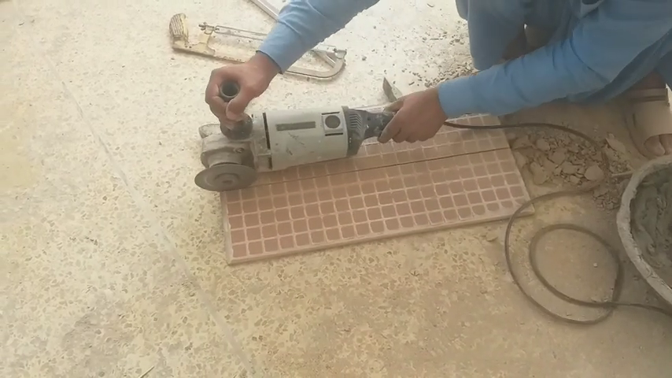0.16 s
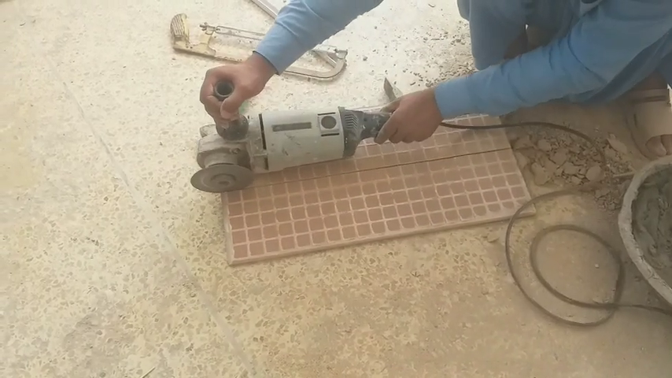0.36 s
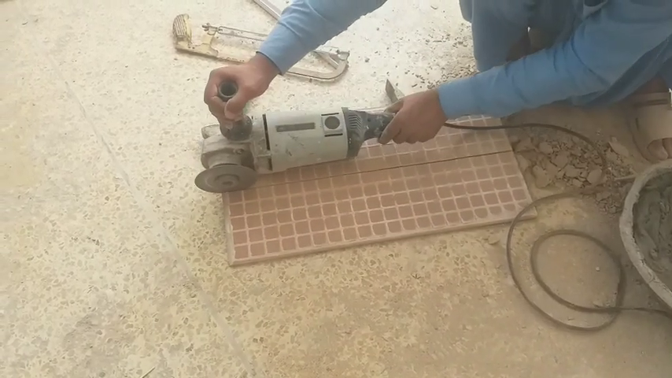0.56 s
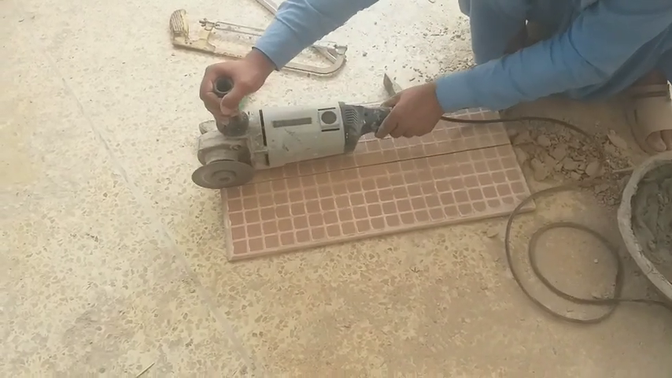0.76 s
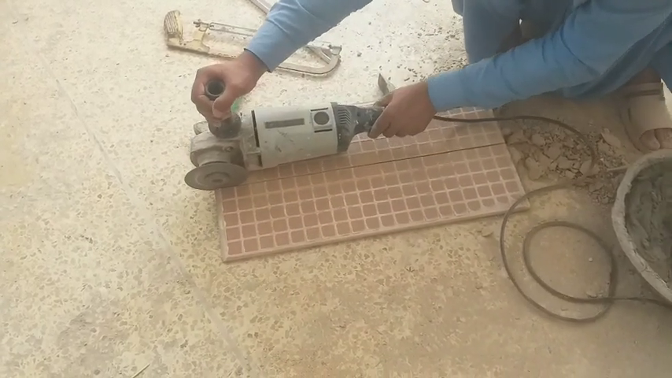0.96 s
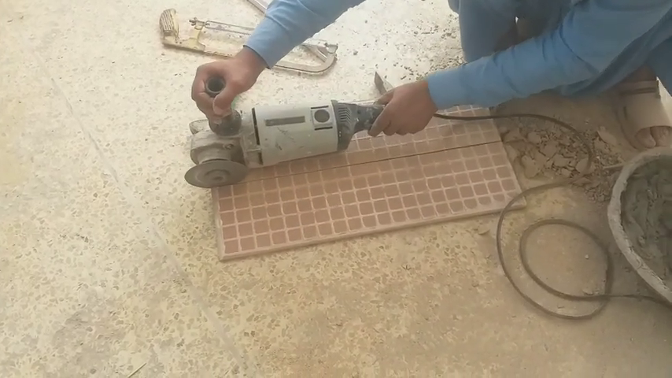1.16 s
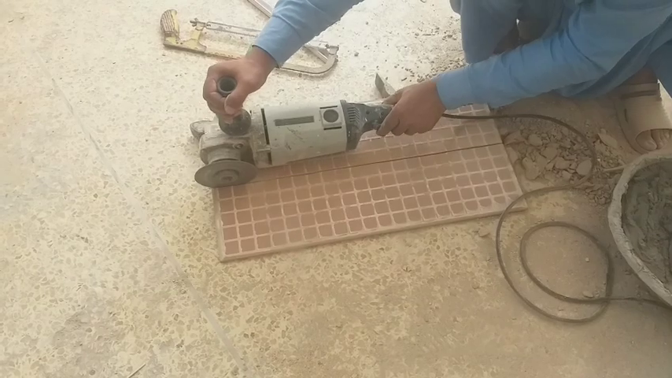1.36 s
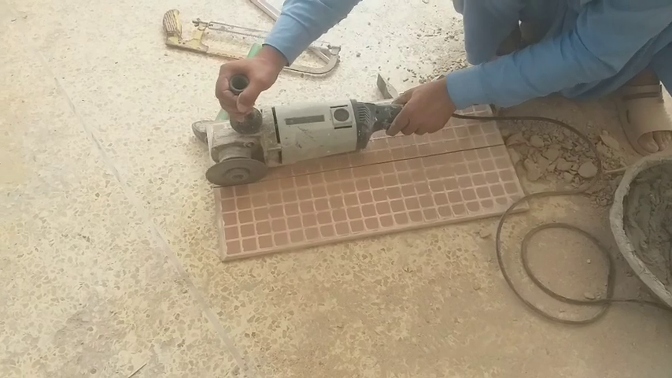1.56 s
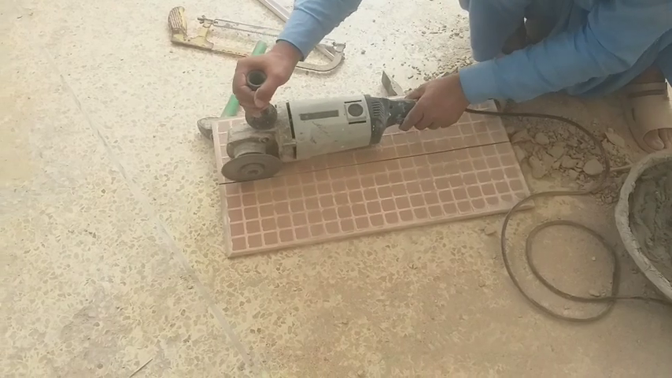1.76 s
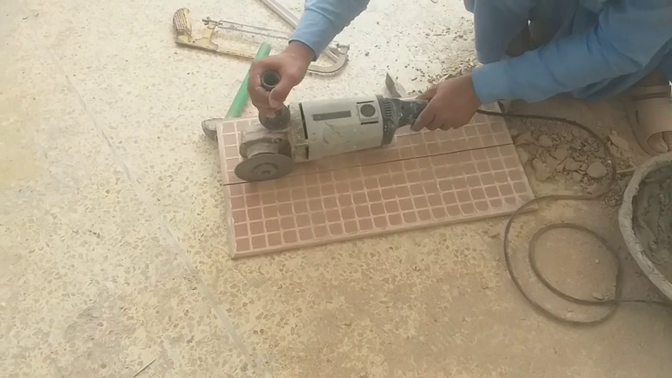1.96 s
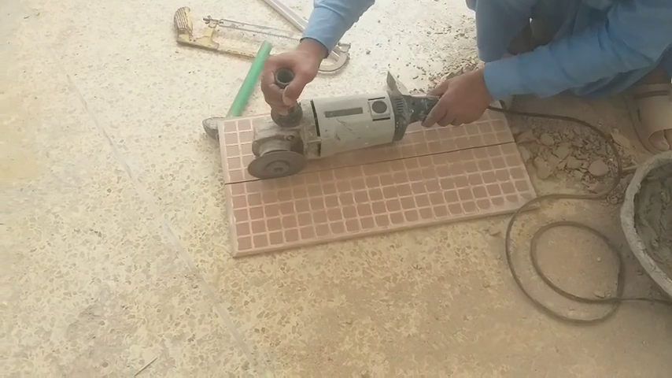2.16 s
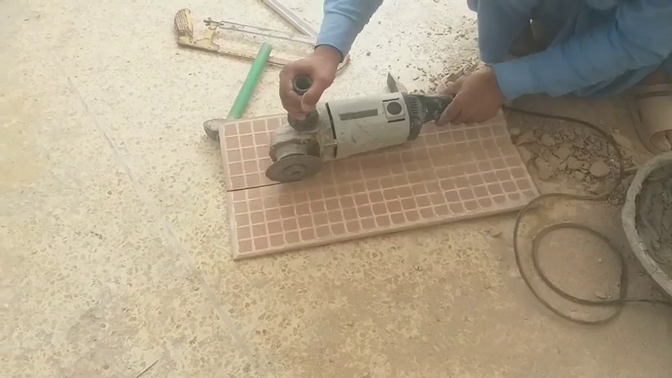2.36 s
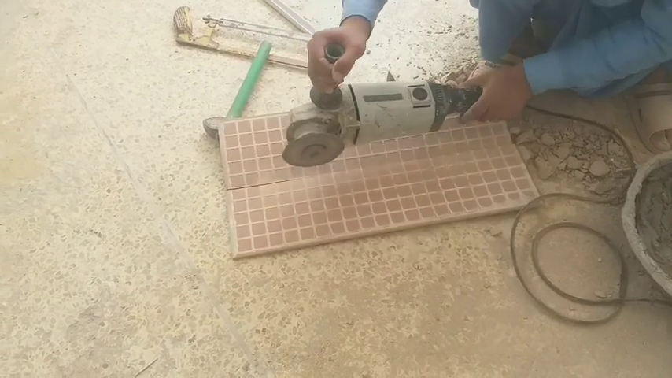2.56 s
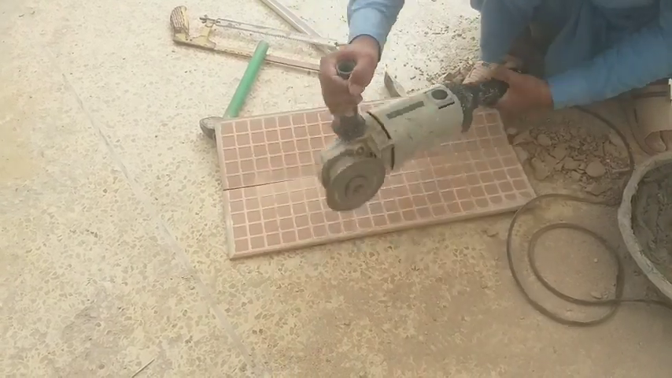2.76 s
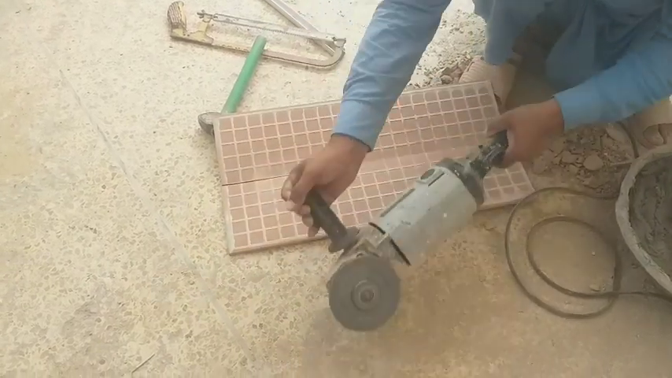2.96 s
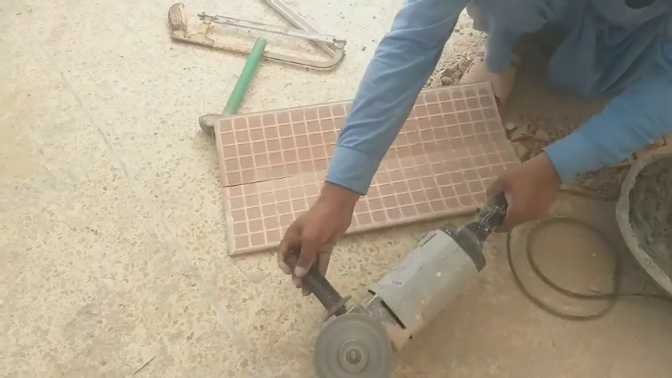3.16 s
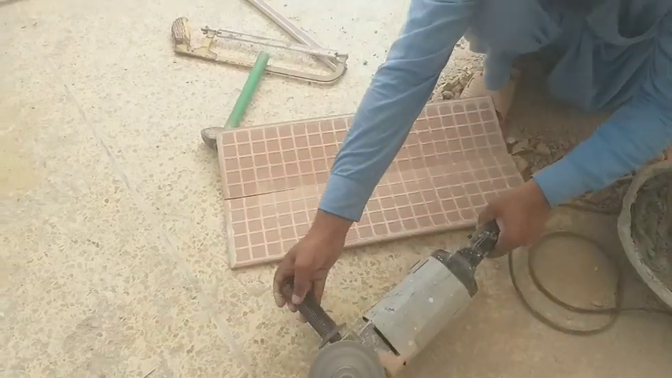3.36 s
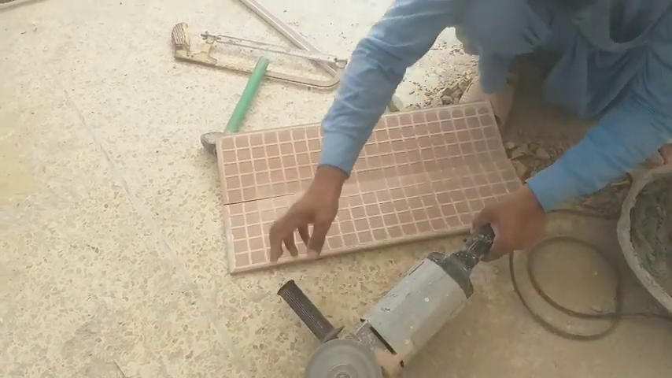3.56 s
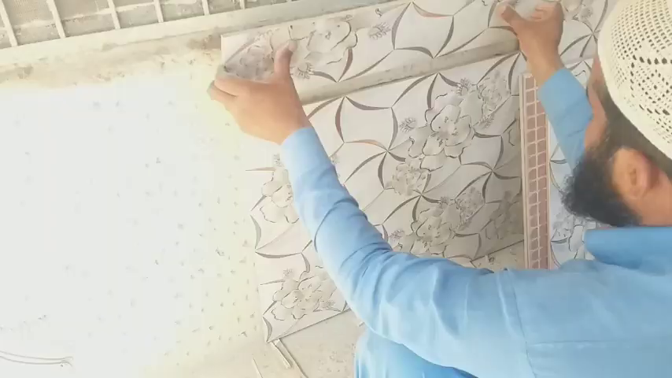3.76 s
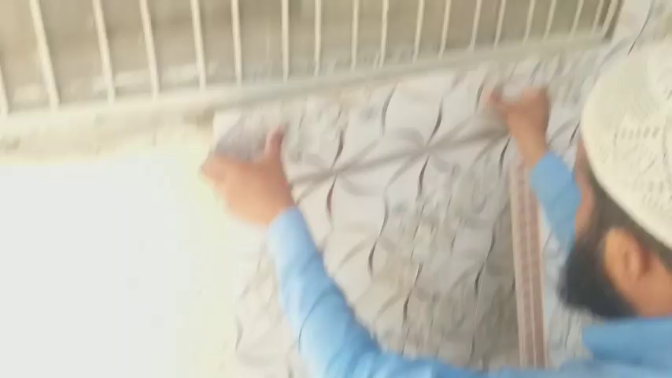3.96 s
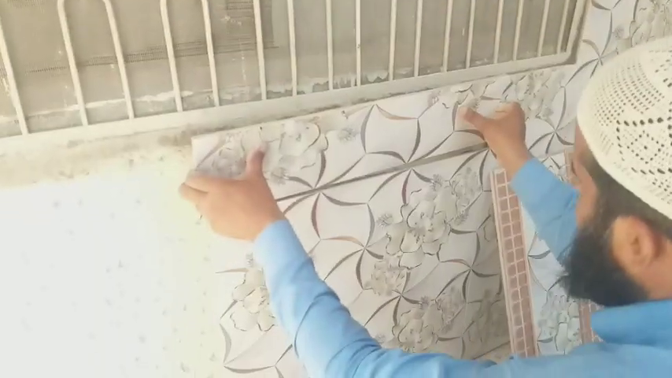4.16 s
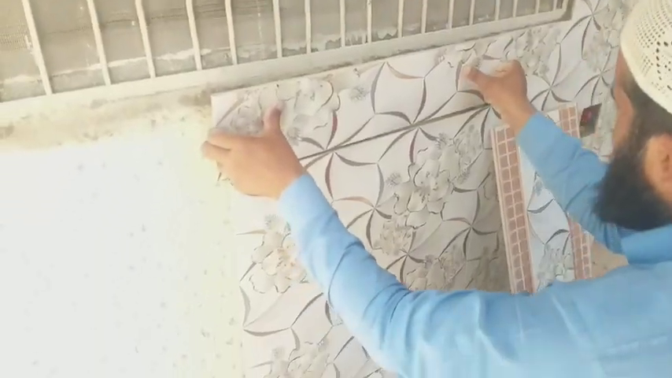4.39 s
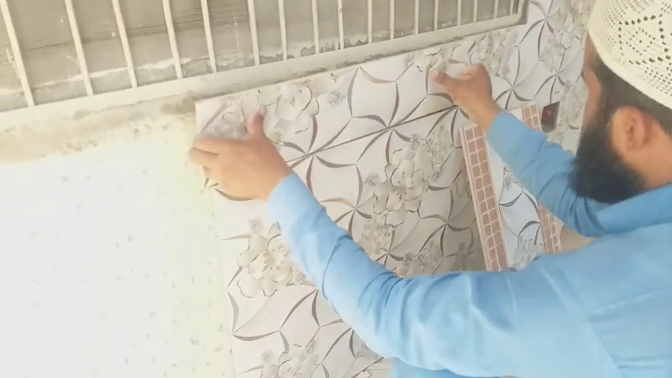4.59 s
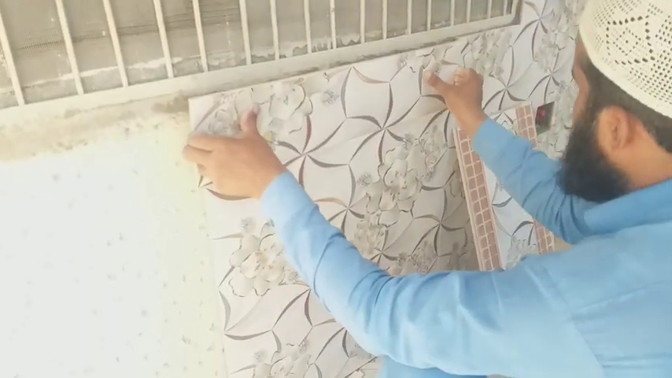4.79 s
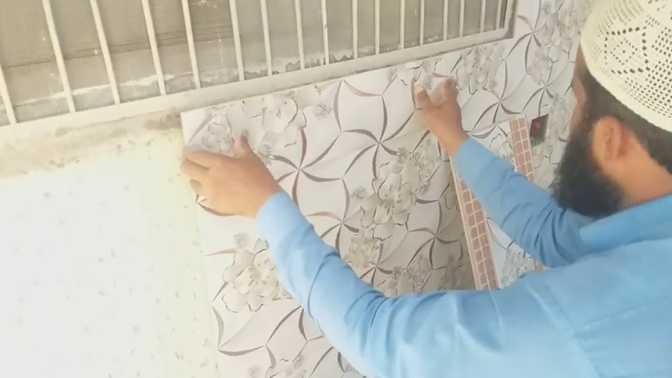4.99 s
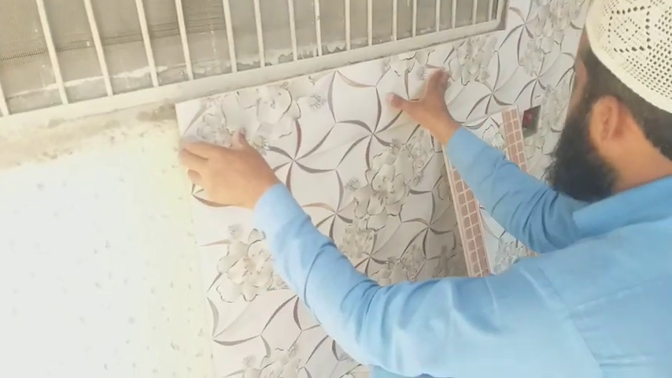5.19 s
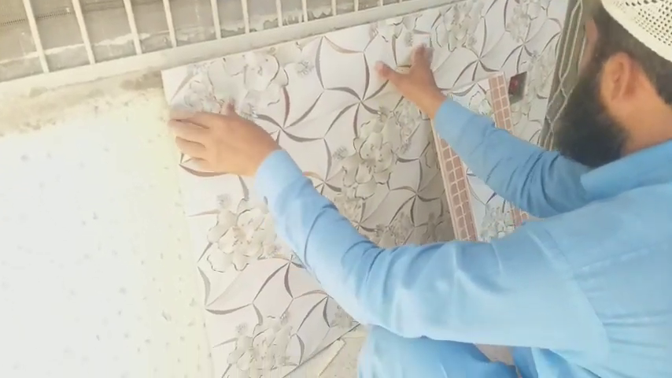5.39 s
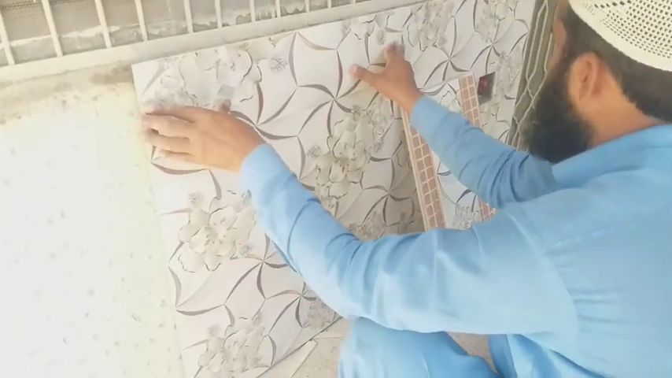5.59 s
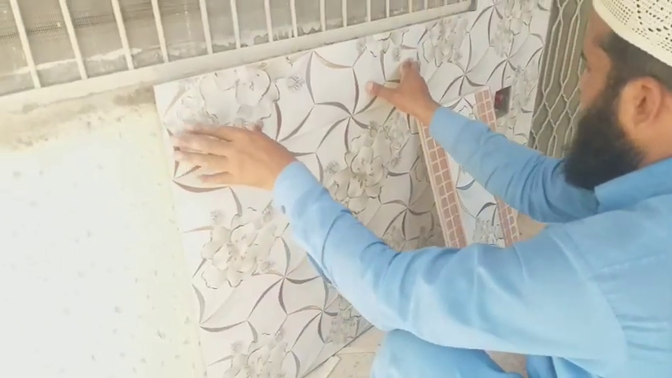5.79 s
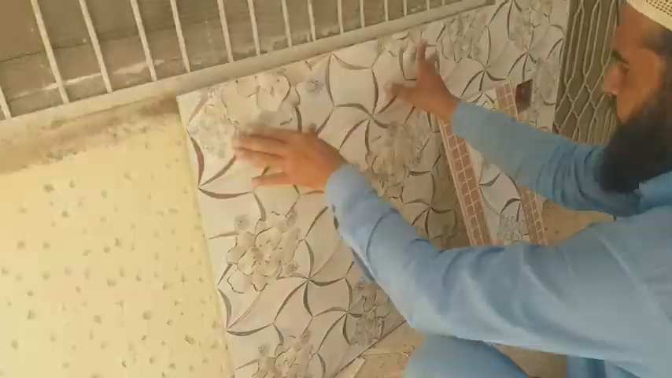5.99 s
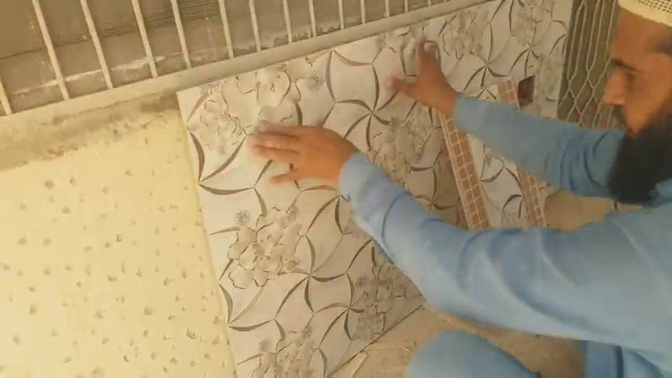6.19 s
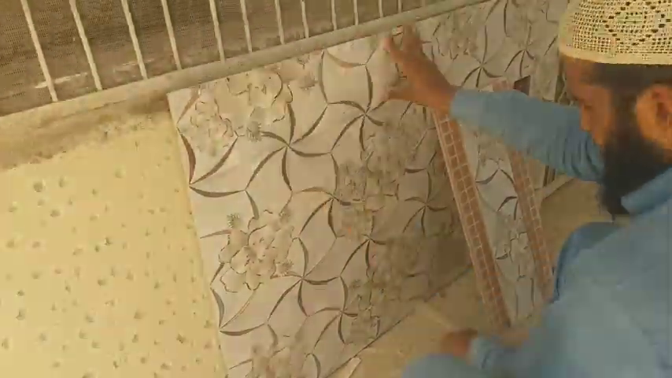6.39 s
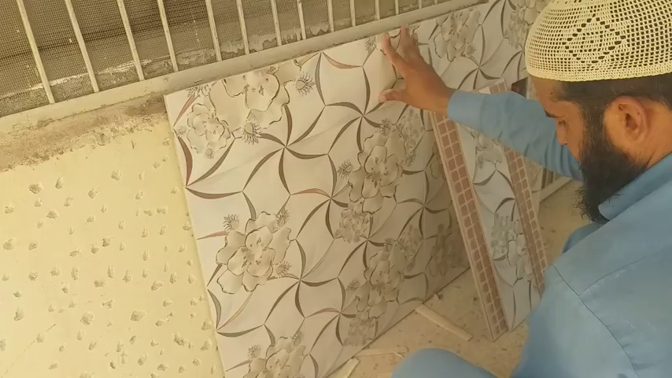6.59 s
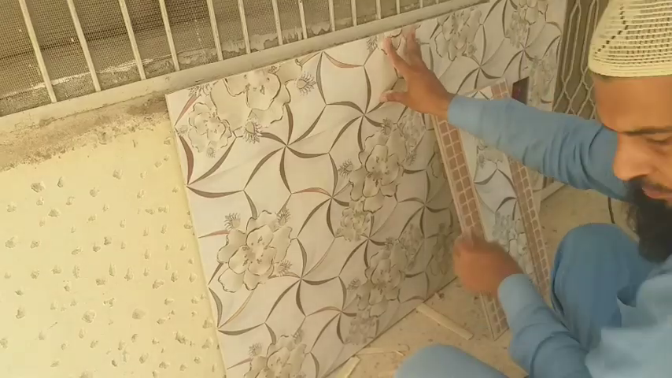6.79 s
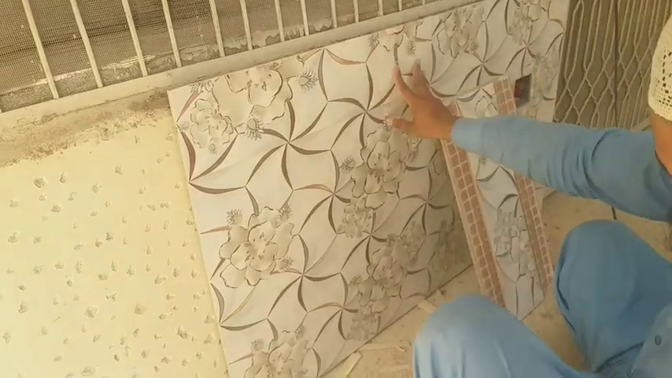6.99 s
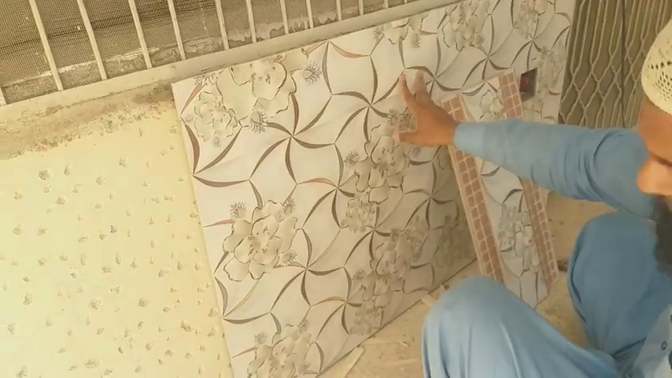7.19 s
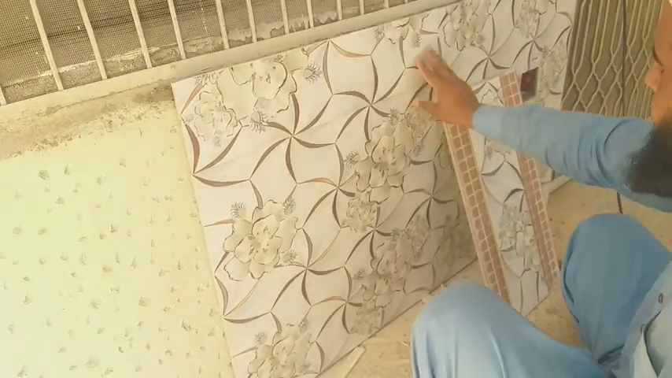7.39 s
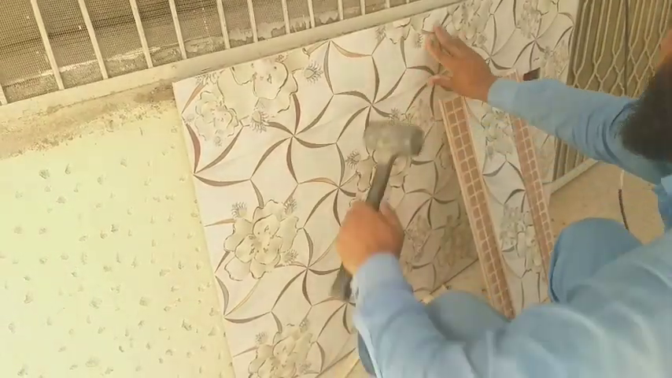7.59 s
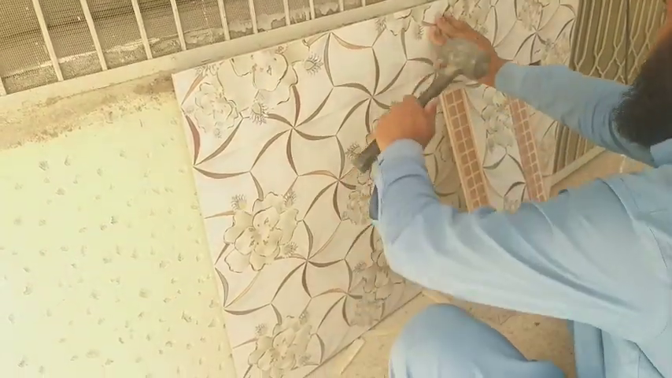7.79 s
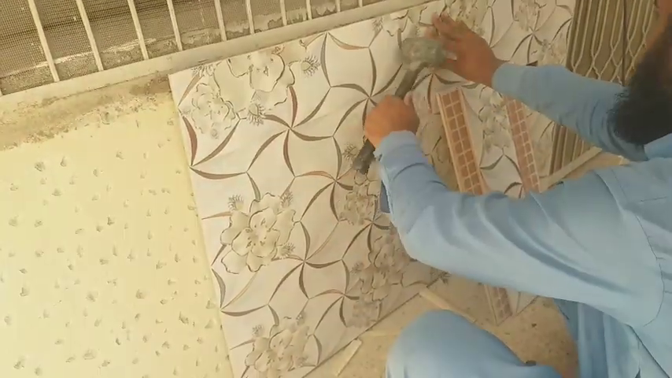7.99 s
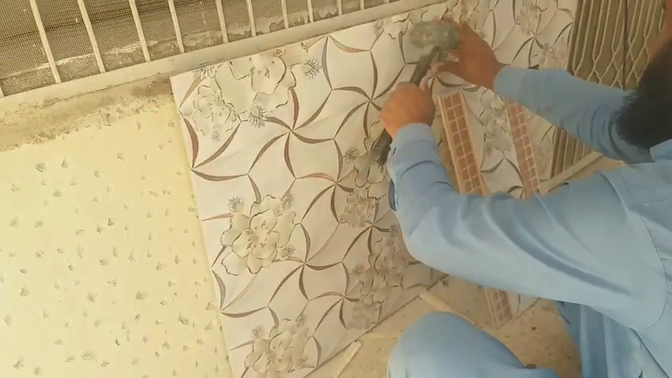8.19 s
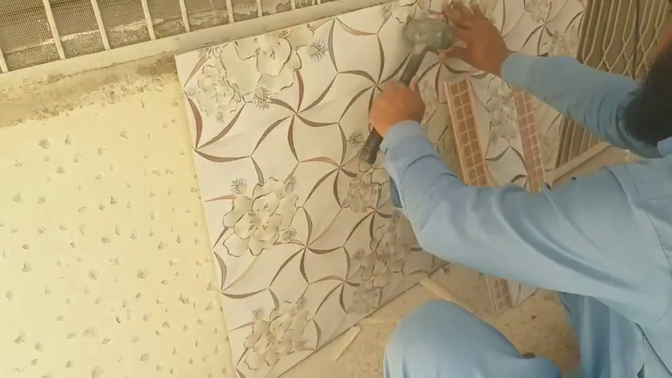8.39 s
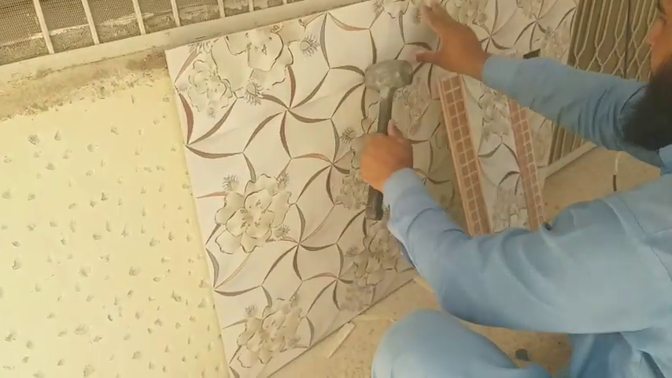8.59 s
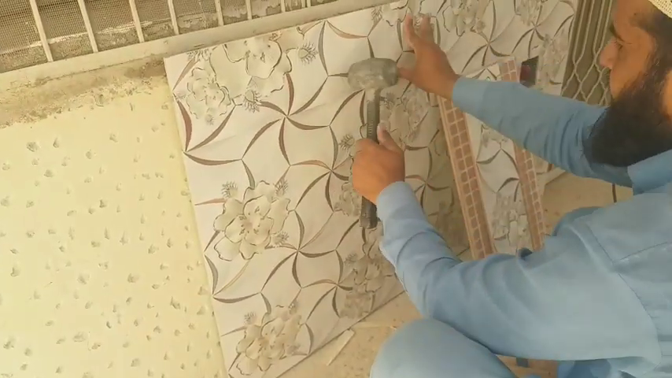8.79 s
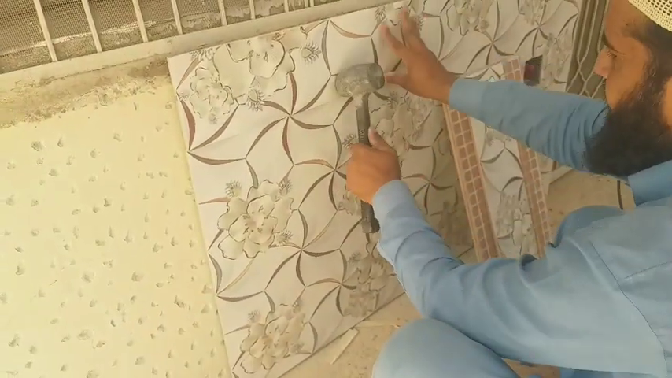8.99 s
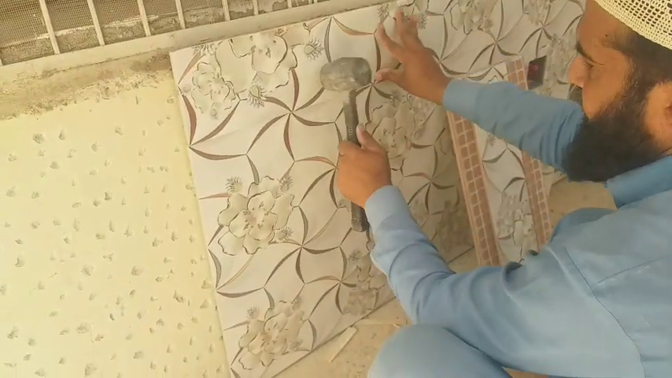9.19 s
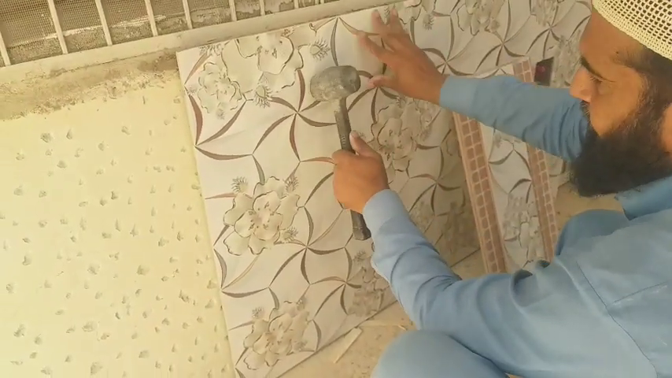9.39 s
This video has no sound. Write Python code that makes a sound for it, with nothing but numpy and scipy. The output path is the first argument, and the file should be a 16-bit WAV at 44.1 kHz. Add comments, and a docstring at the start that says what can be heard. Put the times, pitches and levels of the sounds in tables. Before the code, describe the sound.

Close to the microphone, an angle grinder cuts ceramic tile with a loud, gritty, fluttering roar and short squeals. It lifts clear, races and coasts down with rattling gears. A hard cut leads to a much quieter room with steady hiss, where a wall tile scrapes and bumps into mortar. Faint birds chirp outside, then a hammer taps the tile about ten times, thudding with a short boom.

```python
"""An angle grinder cuts through a ceramic tile, lifts clear, races briefly and coasts down with rattling gears.
Grit noise rings the resonances of disc and tile; motor and gear tones follow the falling shaft speed.
The scene then jumps indoors: a wall tile scrapes and bumps into its mortar bed, as shaped noise and damped
tones, and a hammer taps it home with decaying modes, over a steady room hiss and a few faint bird calls."""
import sys
import numpy as np
from scipy import signal
from scipy.fft import rfft, irfft, next_fast_len
from scipy.io import wavfile
from scipy.ndimage import uniform_filter1d, minimum_filter1d, map_coordinates

SR = 44100
rng = np.random.default_rng(int(sys.argv[2]) if len(sys.argv) > 2 else 0)


def wav_record(signal):
    """Record a signal, one row per channel, as 16-bit PCM in the file named by sys.argv[1]."""
    frames = np.transpose(np.atleast_2d(signal))
    bounded = np.clip(frames, -1, 1)
    # unit amplitude maps onto the largest positive 16-bit level
    quanta = np.round(bounded * 32767).astype(np.int16)
    wavfile.write(sys.argv[1], SR, quanta)


N = 416742


def amp(db):
    """A level in decibels is the logarithm of a pressure ratio; this returns the ratio."""
    return 10 ** (np.asarray(db) / 20)


def unit(x):
    """Root-mean-square normalisation: equal signal power, whatever the waveform."""
    return x / np.sqrt(np.mean(x ** 2) + 1e-20)


def seconds(size):
    """Uniform sampling: one instant [s] per sample."""
    return np.arange(size) / SR


def curves(rows):
    """Linear interpolation: one value per sample for each column after the time."""
    times, *columns = np.transpose(rows)
    return [np.interp(seconds(N), times, column) for column in columns]


def wobble(rate):
    """Band-limited randomness: a smooth curve through `rate` random knots a second."""
    t = seconds(N)
    coarse = t[::32]
    knots = rng.standard_normal(int(N * rate / SR) + 4)
    return np.interp(t, coarse, map_coordinates(knots, [coarse * rate]))


def filtered(x, response):
    """Linear filtering: the spectrum of x times a response of frequency [Hz]."""
    size = next_fast_len(len(x) + 8192)
    frequencies = np.fft.rfftfreq(size, 1 / SR)
    return irfft(rfft(x, size) * response(frequencies), size)[:len(x)]


def coloured(x, spectrum, peaks=()):
    """Source and resonator: a broad spectrum with resonant power added to it, at rms 1."""
    knots_hz, knots_db = np.transpose(spectrum)

    def response(hz):
        broad = amp(np.interp(np.log(hz + 1), np.log(knots_hz), knots_db))
        resonant_power = sum(amp(db) ** 2 / (1 + (2 * (hz - centre) / width) ** 2) ** 2
                             for centre, width, db in peaks)
        return broad * np.sqrt(1 + resonant_power)

    return unit(filtered(x, response))


def grit(rate, spread_db):
    """Shot noise: independent tiny impacts of scattered size, `rate` a second on average."""
    hits = rng.random(N) < rate / SR
    sizes = rng.standard_normal(N) * amp(spread_db * rng.standard_normal(N))
    return unit(hits * sizes)


def add(track, start_s, sound):
    """Superposition: sounds sum in the track, each from its own start."""
    start = round(start_s * SR)
    track[start:start + len(sound)] += sound[:N - start]


def envelope(t, length, attack, release):
    """Exponential relaxation: rise, hold until length, then die away (all in s)."""
    rise = 1 - np.exp(-np.maximum(t, 0) / attack)
    return rise * np.exp(-np.maximum(t - length, 0) / release)


def grinder(lift_time=2.35, lift_length=0.0069, cut_db=-0.93, free_db=-2.0):
    """Load exchange: lifting clear fades power from the cutting noise to the free-running rattle."""
    # the disc squeals when pinched in the slot, and the last row is a brief burst as the tile breaks through:
    # (time [s], length [s], frequency [Hz], level [dB])
    tonal_bursts = [(.06, .09, 4316, -21.5), (.23, .15, 5030, -18.5), (.89, .16, 5020, -20.5),
                    (1.48, .16, 4150, -27), (2.2, .15, 2452, -19), (2.33, .09, 1400, -32)]
    t = seconds(N)
    speed, shaft = shaft_rotation()
    # the noise flutters quickly, at a rate independent of the shaft speed
    flutter = np.sin(2 * np.pi * 46.9 * t + .3 * wobble(5))
    cut = cutting(shaft / 5, flutter)
    rattle = gear_rattle(shaft, flutter)
    contact = .5 - .5 * np.tanh((t - lift_time) / lift_length)
    noise = amp(cut_db) * np.sqrt(contact) * cut + amp(free_db) * np.sqrt(1 - contact) * rattle
    return noise + motor_tones(speed, shaft) + singing(tonal_bursts, width_hz=55)


def shaft_rotation():
    """Rotational inertia: the speed sags under load and decays exponentially once the power is off."""
    # shaft speed under power, sagging with the load: (time [s], speed [turns/s])
    powered = [(0, 566.8), (.7, 568.2), (1.08, 586.4), (1.5, 584), (2.33, 549), (2.61, 585.5)]
    off_time, coast_s = 2.61, 2.45  # after switching off, the speed falls by a factor e in coast_s
    speed = curves(powered)[0] * np.exp(-np.maximum(seconds(N) - off_time, 0) / coast_s)
    angle = 2 * np.pi * np.cumsum(speed * (1 + .0015 * wobble(90))) / SR
    return speed, angle


def cutting(disc, flutter):
    """Forced vibration: grit impacts drive the resonances of disc and tile."""
    # broad grinding noise: (frequency [Hz], relative level [dB])
    grinding = [(30, -66), (70, -45.5), (180, -35.5), (320, -23.5), (500, -27.5), (850, -23.5),
                (1500, -15.5), (2250, -9.5), (2700, -2), (3250, -7.5), (3950, -12.5), (4850, -5),
                (5850, -14.5), (7300, -18), (8000, -25), (9200, -22.5), (10300, -30.5), (14000, -28.5),
                (15500, -36)]
    # resonances of disc and tile: (frequency [Hz], width [Hz], level above the grinding noise [dB])
    disc_modes = [(1005, 80, 7), (1440, 70, 3), (2452, 50, 6), (2550, 50, 2), (2690, 170, 2), (3035, 60, 1),
                  (4700, 120, 0), (5950, 80, 3), (6850, 50, 1), (7570, 50, 3), (9425, 70, 4),
                  (11455, 50, 15), (11780, 80, 8), (12480, 250, 3), (12820, 90, 3), (13660, 110, 6),
                  (13950, 150, 5), (14400, 150, 2)]
    # how hard the disc is fed into the cut: (time [s], relative grinding level [dB])
    feed = [(0, -15), (.22, -12), (.5, -13.5), (.9, -13), (1.03, -17), (1.17, -13.5), (1.5, -13.5),
            (1.7, -12.5), (2.33, -13.5)]
    # the tile's own ring while it is still whole: (frequency [Hz], width [Hz], relative level [dB])
    slab_modes = [(586, 25, -8), (695, 30, -5), (1056, 40, -2), (2695, 50, 5), (3035, 45, 5),
                  (3720, 50, -2), (5020, 60, 3), (5492, 30, 2)]
    hiss_db = -5  # the hiss of the grit, relative to the grinding
    ring_db, ring_fade_db_per_s = -21, 6.5  # the tile rings less as the cut goes through

    feed_db, = curves(feed)
    # the noise flutters quickly and roughens at random, with a slight pulse each disc turn
    roughness = amp(0.22 * np.sin(disc + wobble(6.5)) + 1.23 * flutter + 0.66 * wobble(44.65))
    impacts = grit(rate=22000, spread_db=1.5) * roughness
    noise = driven(coloured(impacts, grinding, disc_modes), feed_db, feed_db + hiss_db)

    def slab(hz):
        return sum(amp(db) / (1 + (2 * (hz - centre) / width) ** 2) for centre, width, db in slab_modes)

    ring = unit(filtered(grit(rate=14000, spread_db=3.0), slab))
    return noise + amp(ring_db - ring_fade_db_per_s * seconds(N)) * ring


def gear_rattle(shaft, flutter):
    """Amplitude modulation: rattling noise flutters quickly, pulses weakly each shaft turn and rings the case."""
    # broad rattle: (frequency [Hz], relative level [dB])
    gears = [(30, -58), (70, -34), (130, -36), (260, -20.5), (520, -25), (1000, -19.5), (2000, -9),
             (2650, -1), (3300, -5), (3800, -12.5), (4350, -4.5), (4950, -2.5), (5900, -10.5), (8000, -20),
             (10500, -30), (13000, -26.5), (15500, -32)]
    # resonances of gear case and guard: (frequency [Hz], width [Hz], level above the rattle [dB])
    case_modes = [(2460, 54, 3), (2850, 115, 0.5), (3450, 89, -4.5), (4720, 300, 3.5), (5160, 340, 5)]
    # the gears running free: (time [s], relative rattle level [dB], relative hiss level [dB])
    free_levels = [(2.36, -15, -19.5), (2.48, -18.5, -22), (2.84, -20.5, -23), (3.2, -18, -19),
                   (3.5, -17, -19), (3.82, -18, -20)]
    unevenness = amp(2.2 * flutter + .8 * np.sin(shaft) + .8 * wobble(110))
    impacts = grit(rate=18000, spread_db=1.0) * unevenness
    rattle = driven(coloured(impacts, gears, case_modes), *curves(free_levels))
    # the guard rings for a moment as the speed falls
    return rattle + singing([(3.1, .55, 2427, -25.5)], width_hz=29.1)


def driven(x, body_db, hiss_db):
    """Spectral balance: body and hiss split near 3800 Hz, each set by its strength in a reference band."""
    body = filtered(x, lambda hz: 1 / (1 + (hz / 3800) ** 12))

    def strength(low_hz, high_hz):
        return np.std(filtered(x[:2 * SR], lambda hz: (hz > low_hz) & (hz < high_hz)))

    hiss = x - body
    return body * amp(body_db) / strength(2000, 3500) + hiss * amp(hiss_db) / strength(4000, 7500)


def motor_tones(speed, shaft):
    """Rotational order tones: parts passing per turn set the pitch, and resonances swell the level."""
    # the commutator, louder as it passes a resonance
    whine_db, whine_boost_db, whine_peak_hz, whine_width_hz = -46.5, 7, 10700, 450
    # the gear tone swells as it falls through a resonance of the case
    tooth_db, tooth_boost_db, tooth_peak_hz, tooth_width_hz = -53, 26.5, 4460, 490
    bars, teeth = 22, 9  # commutator bars and pinion teeth passing on every turn of the shaft

    whine_level = whine_db + whine_boost_db / (1 + ((bars * speed - whine_peak_hz) / whine_width_hz) ** 4)
    tooth_level = tooth_db + tooth_boost_db / (1 + ((teeth * speed - tooth_peak_hz) / tooth_width_hz) ** 4)
    whine = np.sin(bars * shaft) * amp(whine_level + 2.5 * wobble(35))
    mesh = np.sin(teeth * shaft) * amp(tooth_level + 2.5 * wobble(60))
    return whine + mesh


def singing(rows, width_hz):
    """Stick-slip: brief narrow-band tones, rough in level and phase, that swell and fade."""
    out = np.zeros(N)
    for start_s, length, hz, db in rows:
        t = seconds(int(length * SR))
        knots = rng.standard_normal((2, int(length * width_hz) + 4))
        in_phase, quadrature = (map_coordinates(k, [t * width_hz]) for k in knots)
        tone = (1 + in_phase) * np.sin(2 * np.pi * hz * t) + quadrature * np.cos(2 * np.pi * hz * t)
        add(out, start_s, amp(db) * np.sin(np.pi * t / length) * unit(tone))
    return out


def hammer(thud_db=3, crack_db=5, modes_db=-16, boom_db=-16, boom_t60=0.43, lag=0.00191):
    """Impulse response: mortar damps each blow to a thud and crack; wall modes and room boom on."""
    # hammer blows: (time [s], blow level [dB], crack level before crack_db [dB], thud pitch [Hz],
    # level of wall and boom before modes_db and boom_db [dB], rebound relative to the blow [dB])
    taps = [(7.888, -25.5, -8, 337, 4.5, -12), (8.041, -21.5, -7.5, 336, 1, -4),
            (8.170, -23, -9.5, 348, 3, -2), (8.302, -20, -10, 327, 0, -14),
            (8.449, -18, -22, 246, -5.5, -14), (8.596, -28, -20, 200, -5, -14),
            (8.766, -19.5, -18, 317, -2.5, -14), (8.908, -19, -19, 323, -4.5, -5),
            (9.172, -15.5, -15.5, 275, -5, -16), (9.322, -16, -6.5, 275, -4.5, -18)]
    # damped modes of the tile: (ratio to the thud pitch, level before thud_db [dB], t60 [s])
    tile_modes = [(.75, -13, 0.024), (1, 3, 0.031), (1.4, -5, .028), (1.85, -10.5, 0.033)]
    # the wall's modes behind the tile: (frequency [Hz], relative level [dB], t60 [s])
    wall_modes = [(88.3, -9.5, 0.4), (128, -13, .35), (172, -5.5, 0.48), (204.6, -4.5, 0.38),
                  (240.5, 0.5, 0.43), (275, -4, .35), (318, -4, 0.34), (361.5, -5, .28),
                  (406.6, -2.5, 0.27), (454, -8, 0.21), (562, -6, .2)]
    # the room's boom: (frequency [Hz], relative level [dB])
    boom_spectrum = [(40, -37), (85, -4), (160, -1), (250, 3), (330, -1.5), (450, -9), (600, -11),
                     (900, -39), (3000, -45), (9000, -72)]
    rebound_s, rebound_hz = .022, 252  # the head lands once more, softly
    out, t = np.zeros(N), seconds(SR // 2)

    def thud(pitch):
        modes = sum(amp(level + rng.normal(0, 1) - 60 * t / t60) * np.sin(2 * np.pi * ratio * pitch * t)
                    for ratio, level, t60 in tile_modes)
        return amp(thud_db) * (1 - np.exp(-t / 0.0028)) * modes

    for start_s, db, hard_db, thud_hz, after_db, rebound_db in taps:
        wall = sum(amp(level + rng.normal(0, 2.7) - 60 * t / t60) * np.sin(2 * np.pi * (hz * t + rng.random()))
                   for hz, level, t60 in wall_modes)
        boom = coloured(rng.standard_normal(len(t)), boom_spectrum) * amp(-60 * t / boom_t60)
        after = amp(modes_db) * wall + amp(boom_db) * boom
        after *= amp(after_db) * (1 - np.exp(-t / 0.0078))
        blow = thud(thud_hz) + amp(hard_db + crack_db) * crack(t60=0.034)
        add(out, start_s + lag, amp(db) * (blow + after))
        add(out, start_s + lag + rebound_s, amp(db + rebound_db) * thud(rebound_hz))
    return signal.sosfilt(signal.butter(2, 55, 'highpass', fs=SR, output='sos'), out)


def crack(t60):
    """Impact excitation: a short hard contact on ceramic is a decaying noise burst, peak 1."""
    # (frequency [Hz], relative level [dB])
    crack_spectrum = [(200, 3), (600, 8.5), (1500, 4.5), (3100, 6), (4200, -16), (7000, -13.5),
                      (10000, -51), (15000, -33)]
    t = seconds(SR // 2)
    noise = coloured(rng.standard_normal(len(t)), crack_spectrum)
    burst = noise * amp(-60 * t / t60) * (1 - np.exp(-t / 0.00025))
    return burst / np.abs(burst).max()


def seating():
    """Contact dynamics: the tile scrapes, judders, catches in sharp ticks and bumps as damped tones."""
    # the tile edge judders as it drags: (time [s], length [s], frequency [Hz], level [dB])
    judders = [(4.42, .09, 760, -42), (4.498, .03, 760, -37), (4.62, .035, 2150, -38), (4.6, .1, 2950, -39)]
    # tile edges catching: (time [s], peak level [dB])
    ticks = [(4.2904, -25), (4.351, -28), (4.51, -28), (4.635, -31), (5.7208, -25.5), (5.827, -36),
             (5.988, -27), (7.346, -35), (8.599, -25)]
    # the tile bumping into its bed: (time [s], level [dB], frequency [Hz], t60 [s])
    bumps = [(4.29, -12.5, 134, 0.025), (5.94, -27, 200, 0.072), (5.971, -16, 208, 0.038),
             (6.016, -30, 130, 0.046)]
    out = scraping() + singing(judders, width_hz=320)
    for start_s, db in ticks:
        add(out, start_s, amp(db) * crack(t60=0.01))
    t = seconds(SR // 5)
    for start_s, db, hz, t60 in bumps:
        bump = np.cos(2 * np.pi * hz * t) * amp(-60 * t / t60) * (1 - np.exp(-t / 0.00027))
        add(out, start_s, amp(db) * bump)
    return out


def scraping():
    """Friction noise: pushes over sandy mortar grow toward their end; grains crushed behind the tile crunch."""
    # pushes of the tile over mortar:
    # (time [s], length [s], dull scrape [dB], gritty scrape [dB], sandy hiss [dB])
    pushes = [(3.804, .21, -43, -46.5, -43), (4.039, 0.16, -42.5, -43, -42), (4.22, 0.05, -47, -45, -59),
              (4.305, 0.047, -40, -41, -47.5), (4.379, 0.13, -38, -45, -42.5), (4.525, .03, -56, -37, -53),
              (4.577, 0.096, -50, -37.5, -51), (5.776, 0.048, -43, -52, -50),
              (5.843, 0.052, -39, -41.5, -50), (5.9, 0.077, -36, -39.5, -48)]
    # grains of mortar crushed behind the tile: (time [s], dull level [dB], sandy level [dB])
    crunches = [(5.782, -50, -43), (8.597, -28.5, -35), (8.641, -38, -40.5), (8.703, -43, -42),
                (8.775, -60, -47)]
    # spectra of the three textures: (frequency [Hz], relative level [dB])
    dull_spectrum = [(40, -29), (180, 1), (450, -3.5), (770, -3), (1100, -5), (1700, -6), (3000, -15.5),
                     (8000, -53)]
    gritty_spectrum = [(300, -15), (1400, -7.5), (2100, -0.5), (2900, 2), (3700, -1), (6000, -8),
                       (8000, -12.5), (10000, -41), (15000, -42)]
    sandy_spectrum = [(1000, -36), (4000, -0.5), (6000, 5), (7700, 1), (9500, -14.5), (12000, -10),
                      (15500, -14)]
    swell_db = 4.5  # growth of a push from its start to its end

    t = seconds(SR // 2)
    dull, gritty, sandy = np.zeros((3, N))
    for start_s, length, dull_db, gritty_db, sandy_db in pushes:
        push = envelope(t, length, attack=0.0079, release=.025)
        push *= amp(swell_db * np.minimum(t / length - 1, 0))
        for track, db in (dull, dull_db), (gritty, gritty_db), (sandy, sandy_db):
            add(track, start_s, amp(db) * push)
    crunch = envelope(t, length=0.0055, attack=0.0038, release=0.011)
    for start_s, dull_db, sandy_db in crunches:
        add(dull, start_s, amp(dull_db) * crunch)
        add(sandy, start_s, amp(sandy_db) * crunch)
    out = dull * coloured(grit(rate=2500, spread_db=-0.5), dull_spectrum)
    out += gritty * coloured(grit(rate=5000, spread_db=2.5), gritty_spectrum)
    return out + sandy * coloured(grit(rate=20000, spread_db=2), sandy_spectrum)


def birds():
    """Frequency modulation: faint gliding chirps and calls from outside, smeared by the walls."""
    # rising chirps: (time [s], level [dB])
    chirp_rows = [(7.11, -53), (7.24, -54), (7.395, -49), (7.545, -54), (7.695, -53)]
    # hoarse falling calls: (time [s], level [dB])
    squawk_rows = [(6.725, -50), (6.955, -47)]
    # short peeps of level pitch: (time [s], level [dB])
    peep_rows = [(6.86, -52), (7.075, -50)]
    calls = glides(chirp_rows, length=.04, from_hz=3620, to_hz=4320, rough_db=2)
    calls += glides(squawk_rows, length=.085, from_hz=2730, to_hz=1980, rough_db=4)
    calls += glides(peep_rows, length=.04, from_hz=2900, to_hz=2900, rough_db=5)
    return walls(calls, t60=.15, wet_db=-3)


def glides(rows, length, from_hz, to_hz, rough_db):
    """Instantaneous frequency: phase integrates a gliding pitch; random level makes the note rough."""
    out, progress = np.zeros(N), np.linspace(0, 1, int(length * SR))
    pitch = from_hz + (to_hz - from_hz) * np.sin(np.pi / 2 * progress)
    swell = np.sqrt(np.abs(np.sin(np.pi * progress)))
    note = unit(swell * np.sin(2 * np.pi * np.cumsum(pitch) / SR))
    for start_s, db in rows:
        add(out, start_s, amp(db) * note)
    return out * unit(amp(rough_db * wobble(200)))


def room(change_time=5.9):
    """Stationary noise: steady hiss with faint resonances that changes colour once, and thin tones."""
    # broad hiss: (frequency [Hz], relative level [dB])
    hiss_spectrum = [(25, -36), (60, -16.5), (120, -11), (175, -2), (260, -2), (330, -4), (470, -13),
                     (800, -11.5), (1200, -12.5), (2850, -10), (3500, -19.5), (4250, -28.5), (5500, -19.5),
                     (6400, -22), (7300, -31), (8400, -30), (8850, -37), (9200, -49), (15500, -52)]
    # faint resonances, then the broad humps before and after the change of colour:
    # (frequency [Hz], width [Hz], level above the hiss [dB])
    resonances = [(1698, 190, 7), (2900, 1100, -1.5), (5570, 1200, 0.5)]
    early_hump = [(7550, 900, 8.5)]
    late_hump = [(4630, 1400, 6.5)]
    hiss_db, hum_hz, hum_db = -43.5, 1722, -56

    t = seconds(N)
    changed = np.clip((t - change_time) / .2 + .5, 0, 1)
    air = rng.standard_normal(N)
    early = coloured(air, hiss_spectrum, resonances + early_hump)
    late = coloured(air, hiss_spectrum, resonances + late_hump)
    hiss = (1 - changed) * early + changed * late
    # a thin tone, steady in level and wavering in phase
    hum = amp(hum_db) * np.sin(2 * np.pi * hum_hz * t + 1.2 * wobble(50))
    # a faint tone sounds once
    single_tone = singing([(6.22, 0.42, 1345, -53.5)], width_hz=9.0)
    return hiss * amp(hiss_db + 0.96 * wobble(8)) + hum + single_tone


def walls(x, t60, wet_db):
    """Reverberation: a dense decaying tail of reflections smears impacts and ripples the spectrum."""
    t = seconds(SR // 3)
    tail = rng.standard_normal(len(t)) * amp(-60 * t / t60) * (t > .003)
    echo = signal.fftconvolve(x, tail / np.linalg.norm(tail))[:N]
    return (x + amp(wet_db) * echo) / np.sqrt(1 + amp(wet_db) ** 2)


def scene():
    """Superposition in two places: first the grinder, then the work at the wall."""
    jump_time = 3.821  # the scene moves indoors [s]
    indoors = np.clip((seconds(N) - jump_time) / 0.001 + .5, 0, 1)
    yard = walls(grinder(), t60=.2, wet_db=-12)
    inside = room() + seating() + hammer() + birds()
    return ((1 - indoors) * yard + indoors * inside)[None]


def record(dry):
    """Peak limiting, then band limiting: fast gain dips tame the peaks and a low-pass removes the top."""
    top_hz = 15750
    needed = np.minimum(1, .95 / (np.abs(dry[0]) + 1e-9))
    # hold each dip around its peak, then smooth it
    gain = uniform_filter1d(minimum_filter1d(needed, size=181), size=91)
    return filtered(dry[0] * gain, lambda hz: hz < top_hz)[None]


dry = scene()
out = record(dry)
wav_record(out)
```